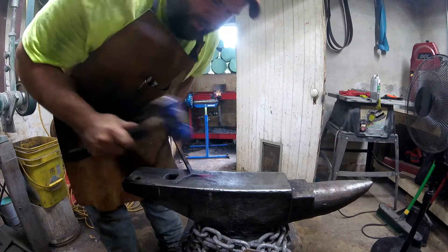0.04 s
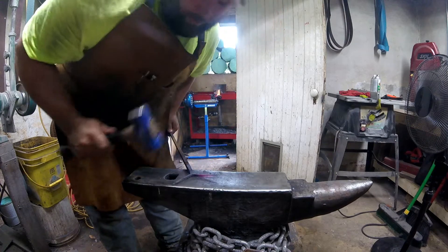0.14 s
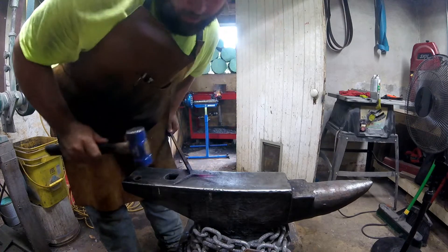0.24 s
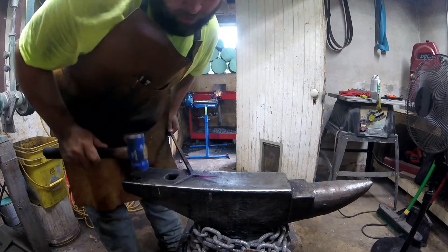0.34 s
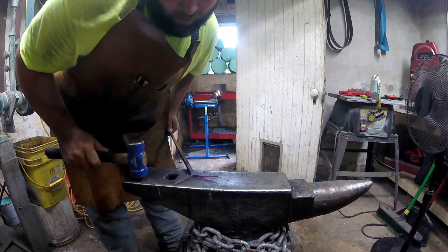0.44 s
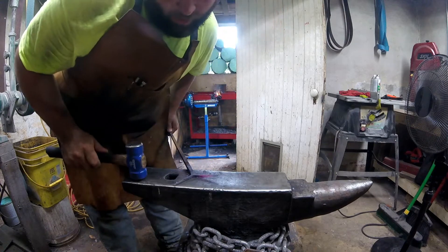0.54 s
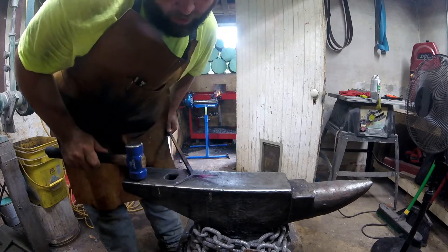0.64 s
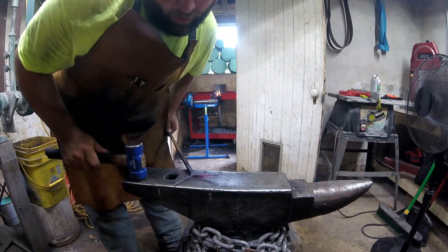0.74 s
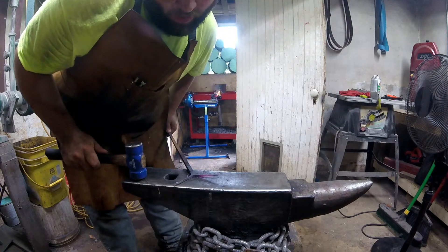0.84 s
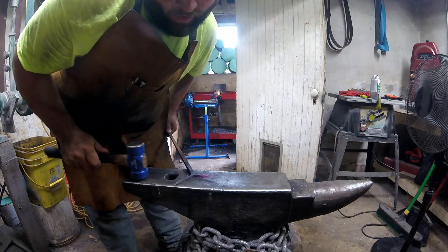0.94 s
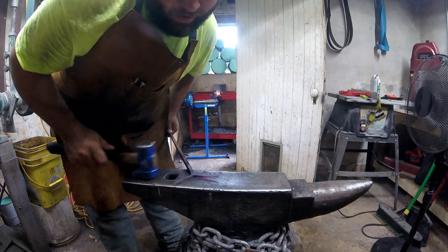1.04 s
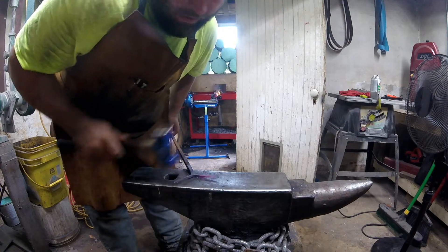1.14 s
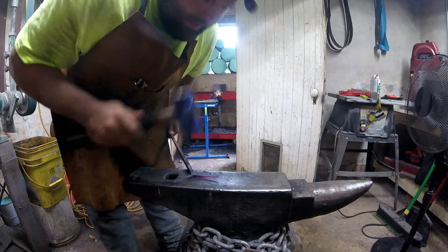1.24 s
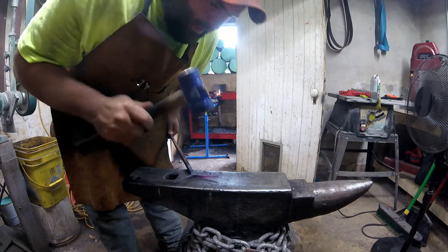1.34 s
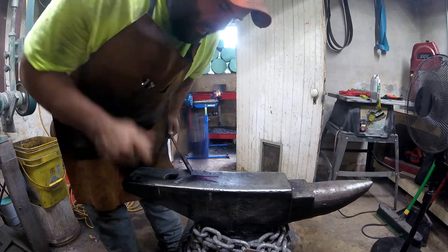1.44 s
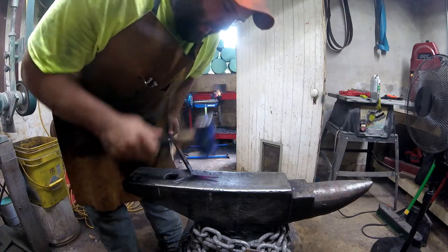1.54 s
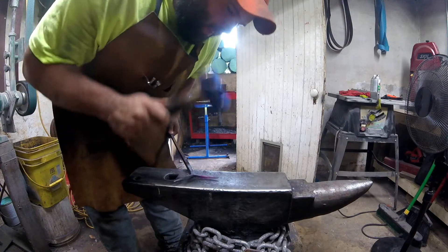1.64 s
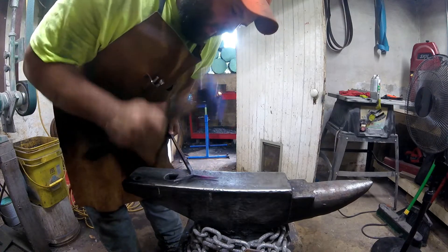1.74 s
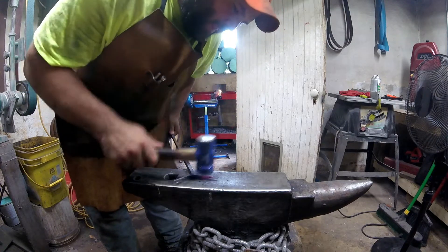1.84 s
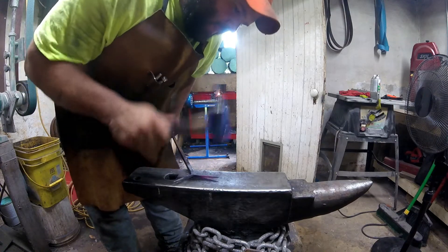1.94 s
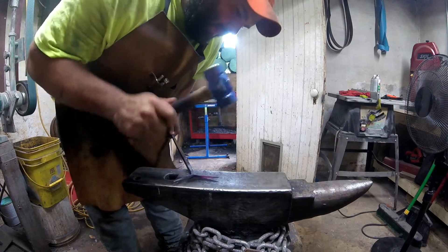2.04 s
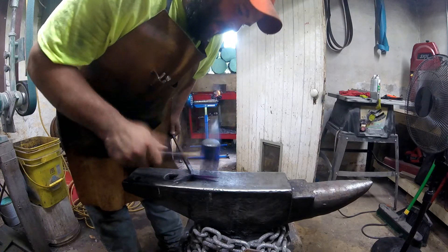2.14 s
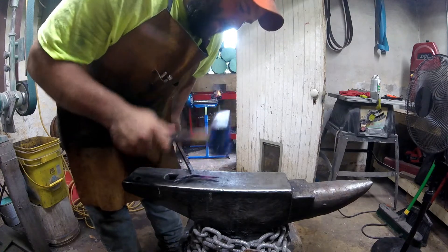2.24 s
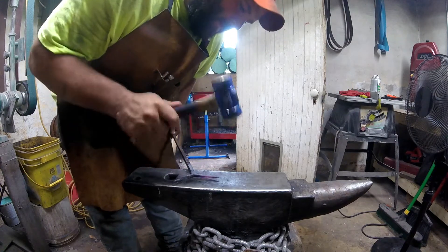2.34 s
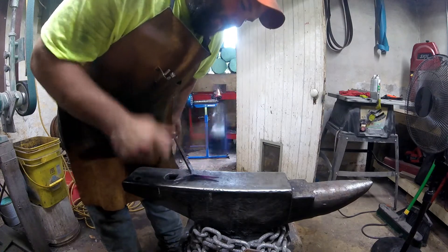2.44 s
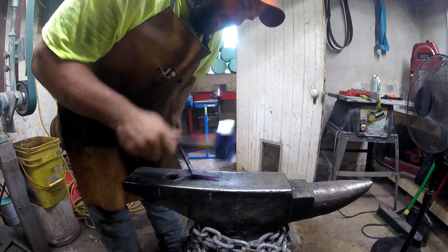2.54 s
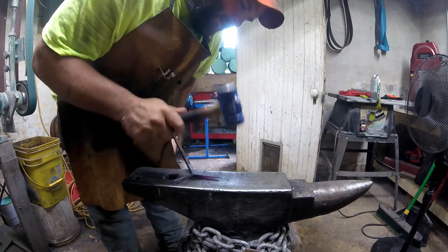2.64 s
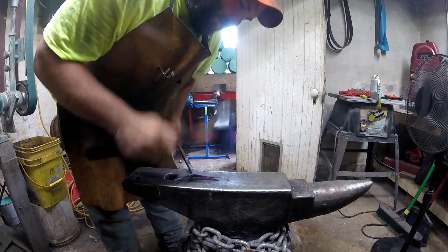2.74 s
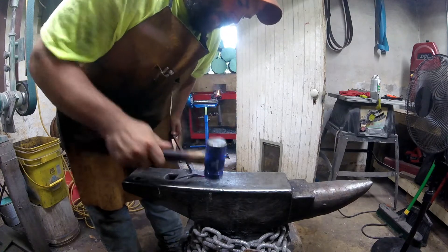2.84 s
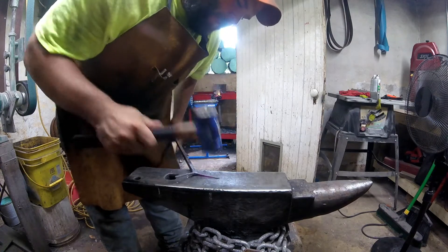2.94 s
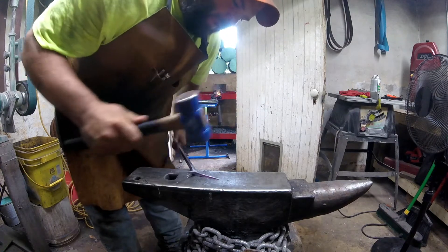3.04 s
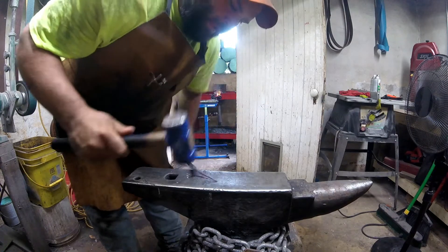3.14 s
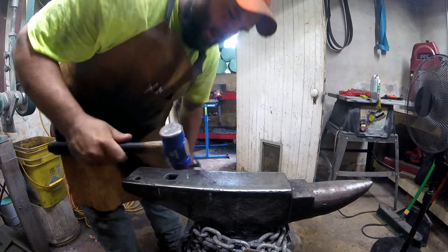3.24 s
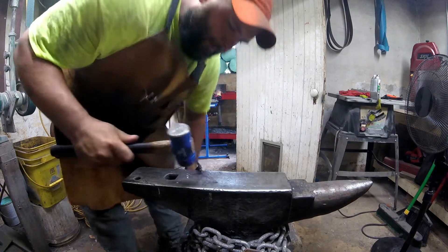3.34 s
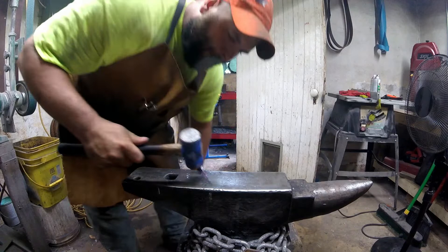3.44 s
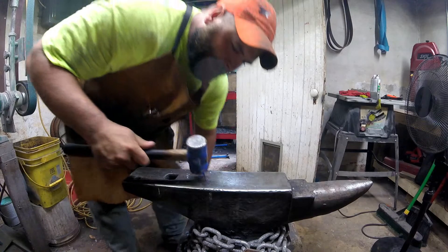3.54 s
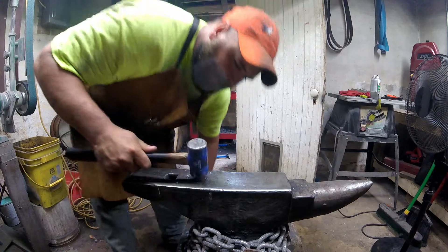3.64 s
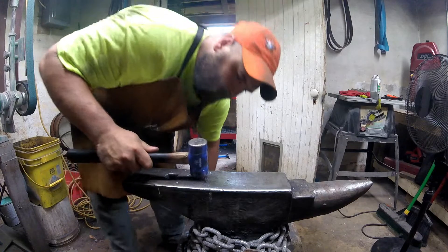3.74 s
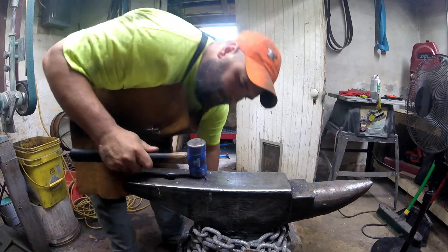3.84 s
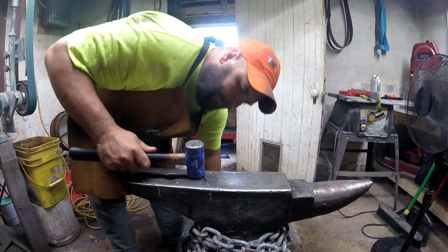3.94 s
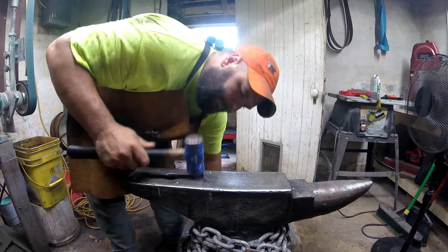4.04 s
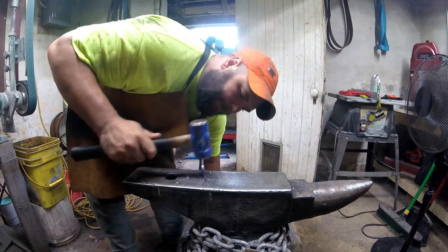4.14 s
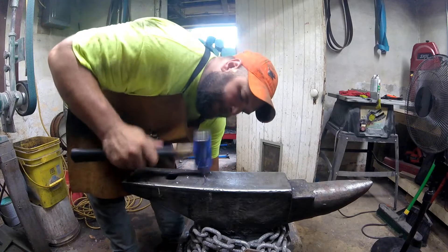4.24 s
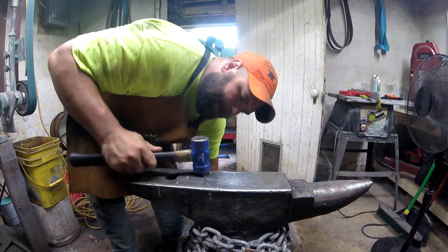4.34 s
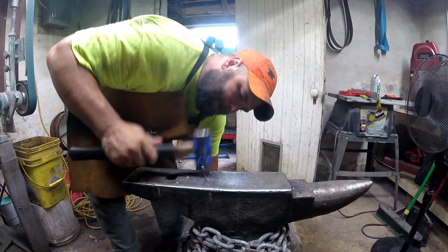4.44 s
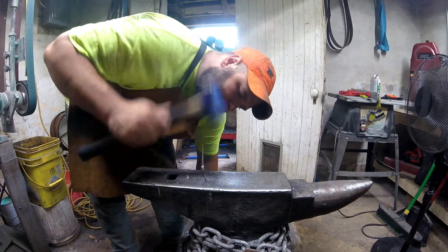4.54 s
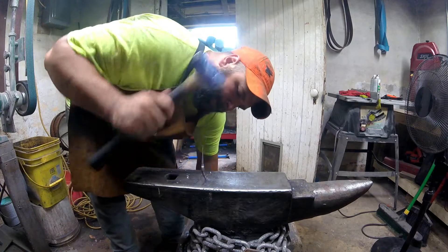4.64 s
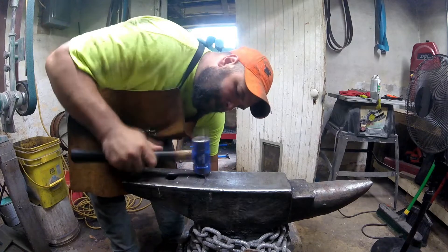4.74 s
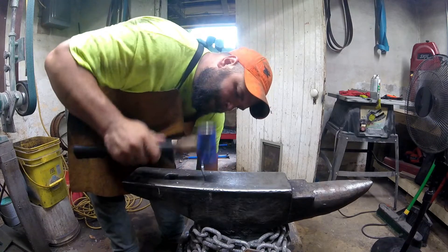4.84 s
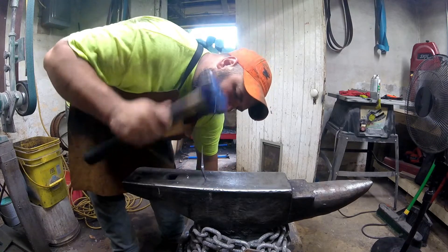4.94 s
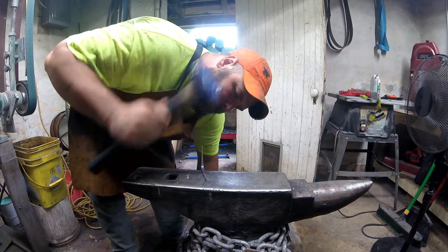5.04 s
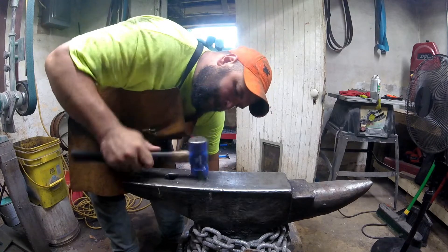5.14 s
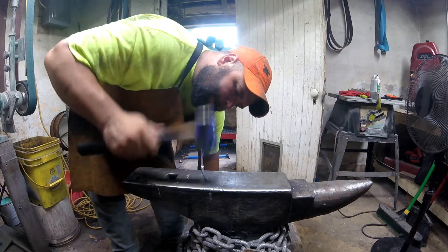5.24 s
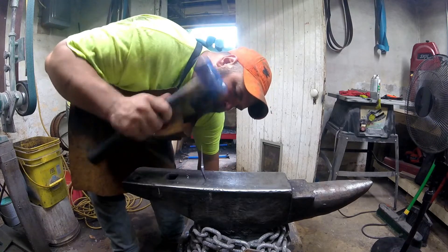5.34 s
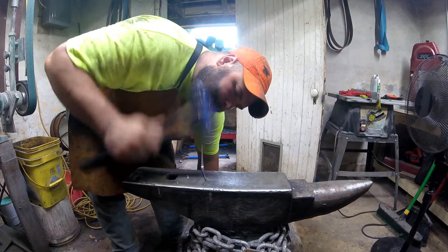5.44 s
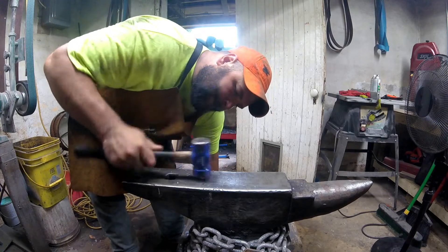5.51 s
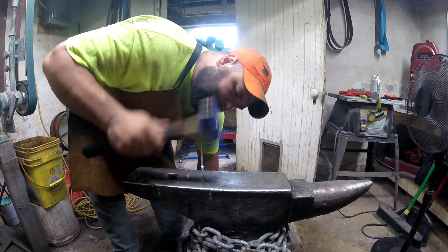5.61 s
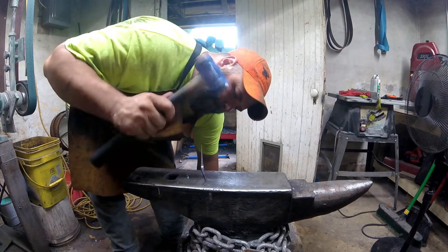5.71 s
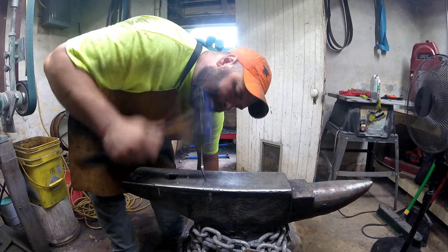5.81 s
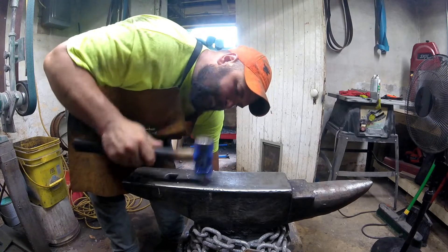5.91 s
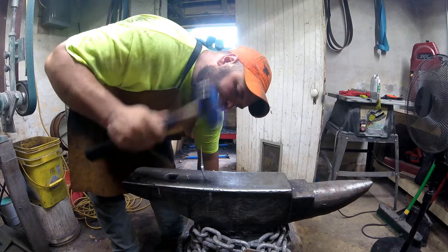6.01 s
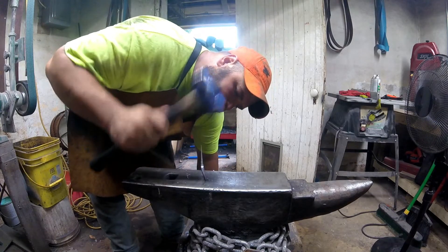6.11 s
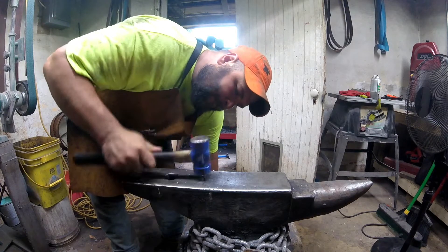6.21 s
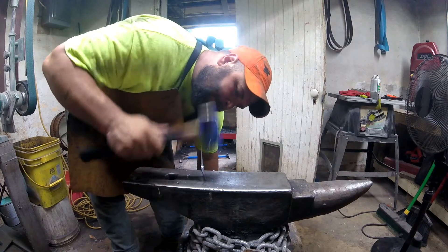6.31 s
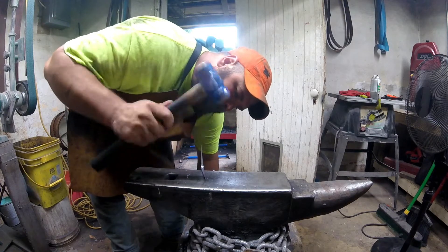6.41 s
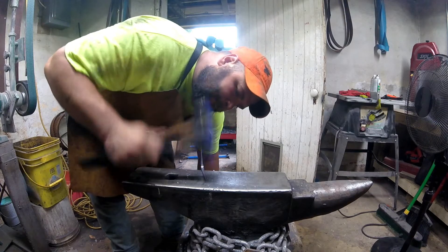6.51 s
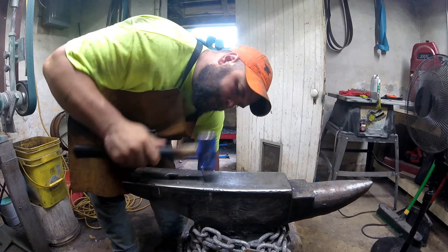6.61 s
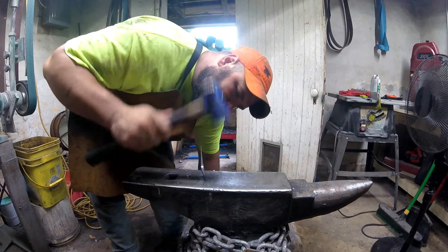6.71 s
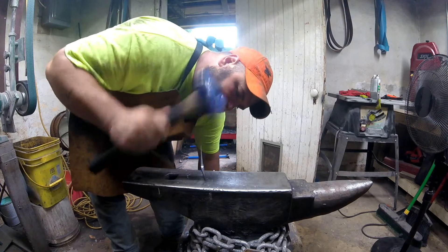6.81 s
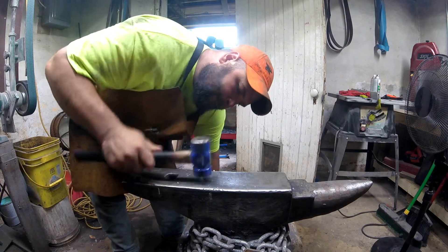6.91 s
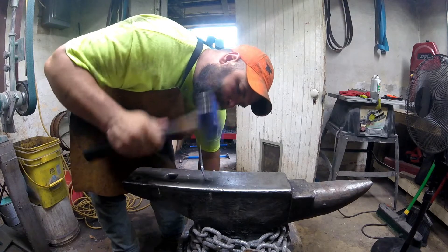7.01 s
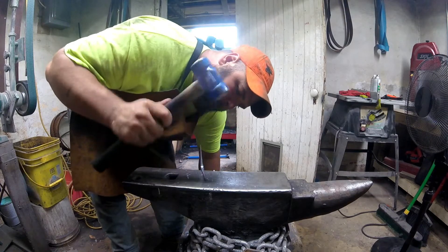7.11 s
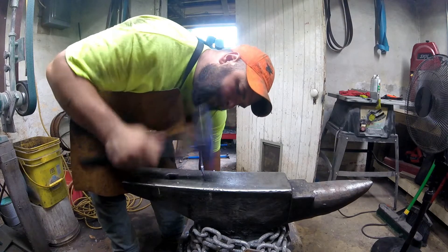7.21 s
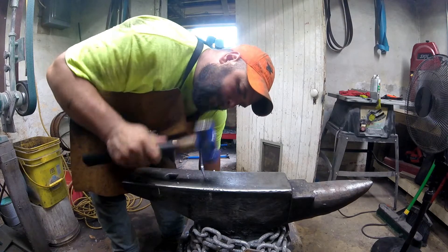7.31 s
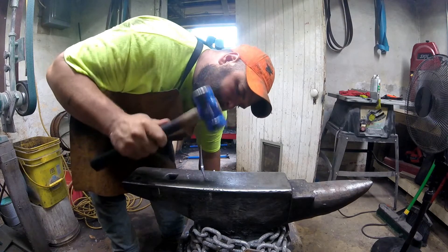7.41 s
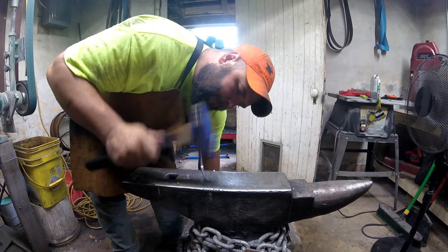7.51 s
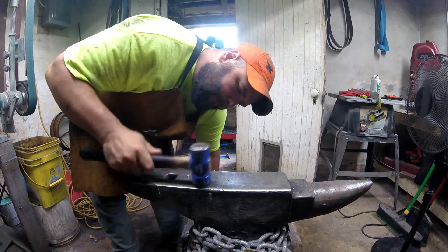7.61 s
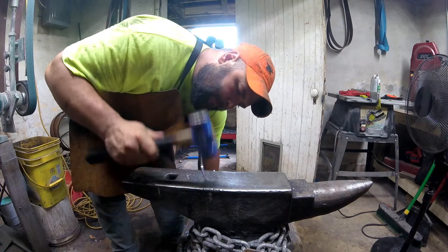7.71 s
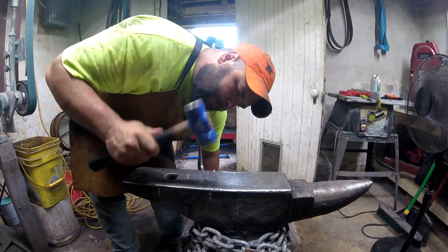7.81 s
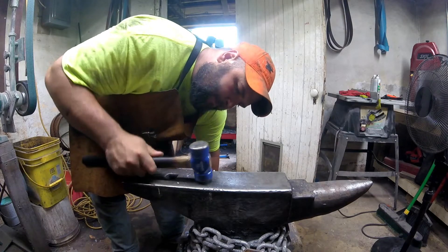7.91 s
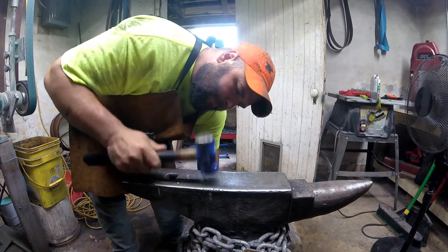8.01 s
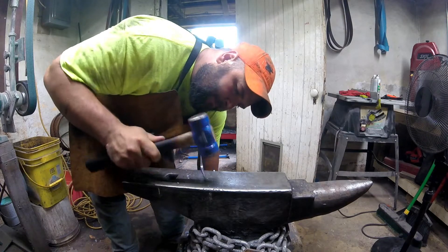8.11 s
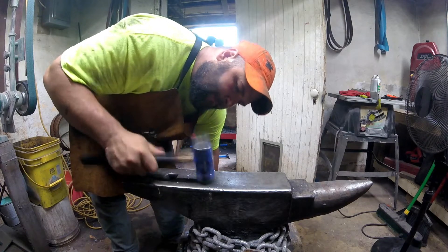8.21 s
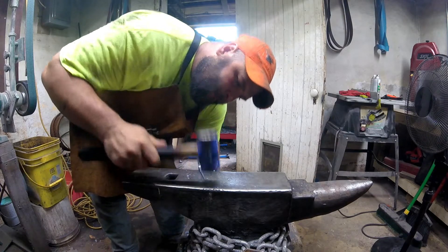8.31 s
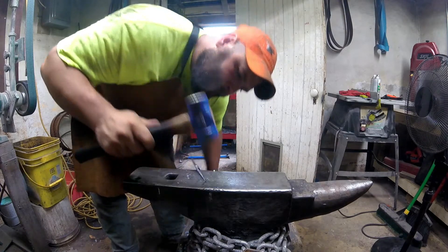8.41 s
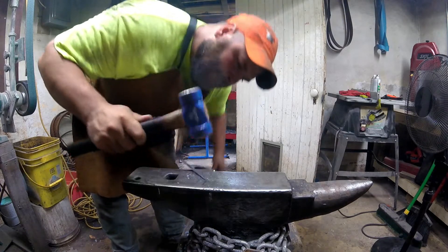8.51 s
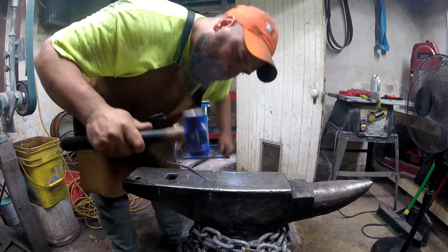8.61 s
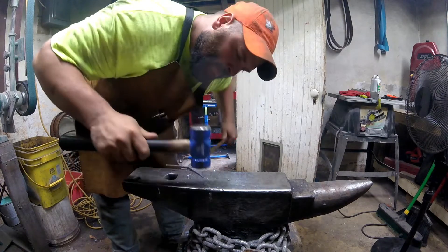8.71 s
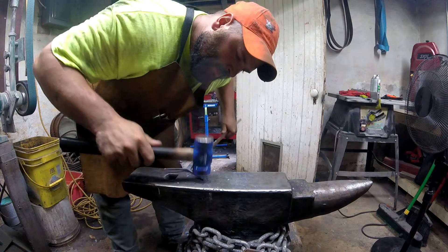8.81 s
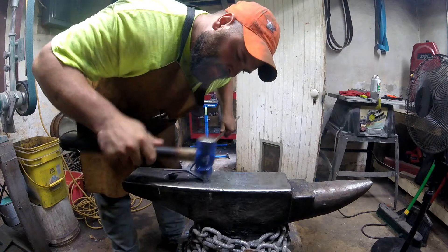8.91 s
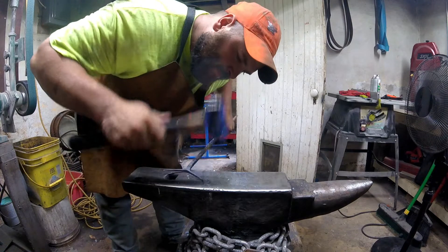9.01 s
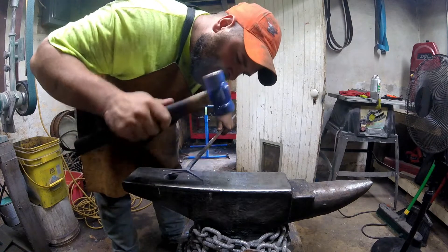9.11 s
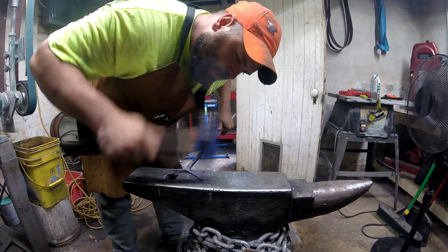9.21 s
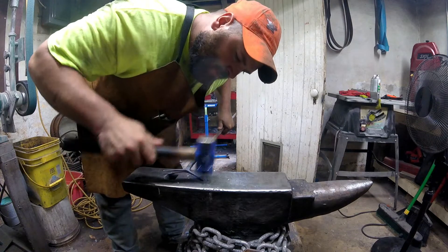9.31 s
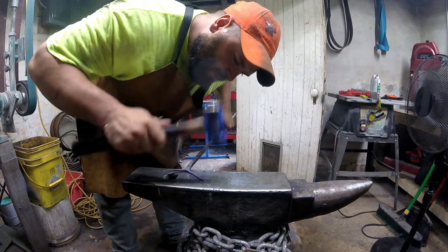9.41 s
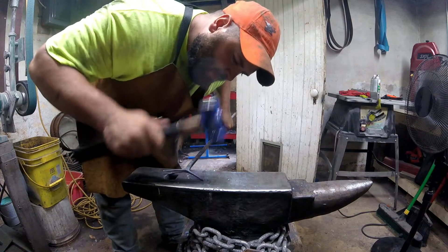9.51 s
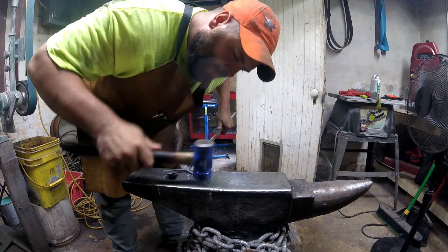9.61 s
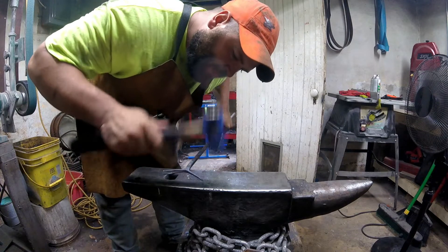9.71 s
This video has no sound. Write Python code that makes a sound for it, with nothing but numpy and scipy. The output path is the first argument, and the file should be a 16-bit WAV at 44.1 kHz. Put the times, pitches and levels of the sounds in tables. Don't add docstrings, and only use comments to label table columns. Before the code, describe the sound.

A hand hammer strikes steel on an anvil in steady ringing runs, with hammer bounces, a scrape and a squeak over a low blower rumble.

```python
import sys
import numpy as np
from scipy import signal
from scipy.fft import rfft, irfft, next_fast_len
from scipy.io import wavfile
from scipy.ndimage import uniform_filter1d, map_coordinates

SR = 44100
rng = np.random.default_rng(int(sys.argv[2]) if len(sys.argv) > 2 else 0)


def gain_from_db(level_db):
    decades = np.asarray(level_db, float) / 20
    return 10 ** decades


def int16_out(signal):
    q = np.round(np.clip(np.atleast_2d(signal).T, -1, 1) * 32767)
    wavfile.write(sys.argv[1], SR, q.astype(np.int16))


N = 430416

# start_s [s], clang_db [dB], thud_db [dB], tone_db [dB], clink_db [dB]
SET_DOWNS = [
    (3.411, -46, -64, -59, -56),
    (3.6563, -46, -45.5, -81, -41),
    (4.3232, -34, -35.5, -44, -40),
    (4.332, -21.5, -37.5, -45, -26.5),
]
# frequency_hz [Hz], t60_s [s]
SHOP_DECAY = [(40, 1), (110, 0.61), (280, 0.53), (740, 0.36), (1940, 0.34), (5000, 0.22), (13500, 0.3)]


def contacts():
    # start_s [s], clang_db [dB], thud_db [dB], tone_db [dB], heel_db [dB]
    bar_blows = [(-0.12, -7, -28, -27, -28), (1.5303, -12, -23.5, -26.0, -20),
                 (1.8777, -8, -25.5, -21.0, -18), (2.2159, -10.5, -30.0, -28.0, -14.5),
                 (2.5323, -9.5, -31, -34.5, -13), (2.8464, -8.5, -32.5, -30.0, -17.5),
                 (4.8056, -7.5, -26.5, -25, -33), (5.1867, -11, -31.5, -13.5, -16.0),
                 (5.5462, -9.5, -26.5, -24.5, -12), (5.904, -9, -26.5, -31.5, -17),
                 (6.2545, -11, -30.5, -22, -12), (6.6023, -12.5, -29.5, -39.5, -19.5),
                 (6.9502, -10.5, -32.5, -29.5, -11), (7.2995, -11.5, -33.5, -23.5, -9),
                 (7.6238, -29.5, -32, -42, -41), (7.9713, -16, -31.5, -37, -45),
                 (8.2879, -15, -29, -50.5, -31), (8.9135, -24.5, -36.5, -48, -52),
                 (9.3088, -10, -24, -27, -22), (9.648, -8.5, -25, -26.5, -18)]
    # start_s [s], clang_db [dB], thud_db [dB], tone_db [dB], heel_db [dB]
    face_bounces = [
        (0.4694, -13.5, -39.5, -18, -26),
        (0.5488, -20, -43.5, -33.5, -28),
        (0.5799, -24, -44.5, -30.5, -51),
    ]
    # thud_db [dB], tone_db [dB], heel_db [dB]
    usual_db = (-19, -18, -13)
    # thud_share, tone_share, heel_share [dB per dB]
    part_levels = dict(knock=(-13.5, -13, -27, 0.6949, -0.0652, -0.03),
                   sizzle=(-22, -35, -16, 0.71, 0.05, -0.2), bend=(-24.5, 3, -36, .05, -0.04, 0.15),
                   face=(-9, -12, -11.5, -0.12, 0.4333, 0.0552), waist=(-29, -23.5, -30, 0.33, 0.36, .45),
                   horn=(-30.5, -29, -25, -0.1, 0.46, -0.22), edge=(-24, -31.5, -13.5, 0.27, 0.44, -0.33),
                   hole=(-35, -53, -42, -1.3, 0.44, 0), shimmer=(-44, -48, -45, 0, 0.64, 0.1),
                   top=(-47, -68.5, -55, 0.7, 0.24, -0.2))
    # start_s [s], brightness_db [dB]
    crispness = [
        (1.53, 14),
        (4.81, -4.5),
        (5.19, 2),
        (5.9, -3.5),
        (6.6, 0),
        (7.62, -11.5),
        (7.97, -14),
        (9.31, -4.5),
        (9.65, -3),
    ]
    crisp_shares = dict(sizzle=1.05, face=0.28, waist=.45, horn=0.79, edge=.7, shimmer=1, top=1)
    out = []
    for kind, rows in enumerate((bar_blows, face_bounces, SET_DOWNS)):
        for s, clang_db, *given in rows:
            odd_db = np.array(given) - clang_db - usual_db
            crisp_db = sum(db for when, db in crispness if abs(when - s) < .04)
            levels = dict(clang=clang_db, thud=given[0], long=given[1], heel=given[2])
            for name, row in part_levels.items():
                follow_db = np.dot(row[3:], odd_db) + crisp_shares.get(name, 0) * crisp_db
                levels[name] = clang_db + row[kind] + follow_db
            out.append((s, levels))
    return sorted(out, key=lambda contact: contact[0])


def blow_noise(clang_db, thud_db, knock_db, sizzle_db):
    # frequency_hz [Hz], density_db [dB per Hz]
    burst_spectrum = [(15, -57.5), (25, 7), (187, 9), (296, 5), (410, 9.5), (927, -4.5), (1320, -6.5),
                      (3060, -14), (3320, -11), (4130, -12), (4480, -20.5), (6730, -25), (8830, -38.5),
                      (15200, -62.5), (16500, -50.5)]
    hz, t, z = signal.stft(rng.standard_normal(SR // 2), SR, nperseg=256)
    room_fall = gain_from_db(-60 * t / along(SHOP_DECAY, hz)[:, None])
    contact_fall = 2.52 * gain_from_db(-60 * t / 0.014)
    noise = signal.istft(z * (room_fall + contact_fall), SR, nperseg=256)[1][:SR // 2]
    noise[:40] = np.diff(21 * signal.windows.gaussian(41, 3.5))

    f = np.fft.rfftfreq(len(noise), 1 / SR)
    weight_db = along([(150, thud_db + 2.5), (700, knock_db + 0.5), (1100, knock_db + 5),
                       (2500, clang_db), (5000, clang_db), (9000, sizzle_db + 19),
                       (13000, sizzle_db + 7.0), (15500, clang_db + 0.5)], f)
    grip = rng.standard_normal(len(f))
    grip = unit(uniform_filter1d(uniform_filter1d(grip, size=16), size=16))
    modes_db = along([(1000, 1), (2500, 2.5), (5000, 3.5), (9000, 6.5)], f) * grip - 7 * (f < 900)
    modes_db += 14.5 * np.exp(-((f - 15520) / 160) ** 2) - 40 * (f > 15850)

    cepstrum = irfft(np.log(gain_from_db(along(burst_spectrum, f) + weight_db + modes_db) + 1e-9))
    cepstrum[1:len(cepstrum) // 2] *= 2
    cepstrum[len(cepstrum) // 2 + 1:] = 0
    impulse = irfft(np.exp(rfft(cepstrum)))[:SR // 5]
    return signal.fftconvolve(noise, impulse)[:len(noise)]


def standing_waves():
    # frequency_hz [Hz], level_db [dB]
    stand_modes = [(39, -9.5), (67, -2.5), (87, -11), (110, -7.5), (179, 1), (229, -10.5), (271, -6.5),
                   (300, -9.5), (316, -11.5), (386, 0), (427, 0.5), (486, -2.5), (511, -6.5), (540, -1.5),
                   (563, -5.5), (614, -5), (666, -6.5), (700, -4.5), (733, -3), (771, -3), (794, 0.5),
                   (834, 1), (869, -2)]
    hz, db = np.transpose(stand_modes)[:, :, None]
    t = np.arange(SR // 2) / SR
    phase = rng.uniform(0, 2 * np.pi, hz.shape)
    decay = gain_from_db(db - 60 * t / (0.71 * along(SHOP_DECAY, hz)))
    waves = decay * np.sin(2 * np.pi * hz * t + phase) * (1 - np.exp(-t / 0.0043))
    is_low = hz[:, 0] < 320
    return waves[is_low].sum(0), waves[~is_low].sum(0)


def blows():
    out = np.zeros(N + 2 * SR)
    low, middle = standing_waves()
    for s, db in contacts():
        burst = gain_from_db(8.5) * blow_noise(db["clang"], db["thud"], db["knock"], db["sizzle"])
        waves = gain_from_db(db["thud"] - 1.2) * low + gain_from_db(db["knock"] - 7) * middle
        out[place(s + .0004):][:len(burst)] += burst + waves
    return out[place(0):][:N]


def family(modes, t, scatter_db):
    hz, db, t60 = np.transpose(modes)[:, :, None]
    luck = rng.standard_normal((len(modes), 6))
    slow = np.sin(2 * np.pi * (22 + 6 * luck[:, 2:3]) * t + 3 * luck[:, 3:4])
    fast = np.sin(2 * np.pi * (47 + 9 * luck[:, 4:5]) * t + 3 * luck[:, 5:])
    flutter = slow + fast
    strike_db = scatter_db * (1 + (hz / 7000) ** 2) * luck[:, :1]
    envelope = gain_from_db(db + strike_db + 2.1 * flutter - 60 * t / (.9 * t60))
    tones = np.sin(2 * np.pi * hz * t + 1.3 * luck[:, 1:2] + 0.3 * flutter)
    return np.sum(envelope * tones, 0) * (1 - np.exp(-t / 0.0008))


def anvil():
    # frequency_hz [Hz], level_db [dB], t60_s [s]
    bend_modes = [(1562, -4, .32), (1738, -13, .26), (1798, -1, .31), (1826, -1, .31), (1878, -12, .26),
                  (10290, -46, .3), (13913, -46, .35)]
    face_modes = [(3268, -5, .25), (3348, -7, .2), (3382, -2, .28), (3405, -7, .28), (3465, -10, .22),
                  (3598, -6, .22), (15472, -41, .26)]
    heel_modes = [(3821, -8, .26), (3911, -15, .25)]
    waist_modes = [(4977, 0, .38), (4714, -7, .33)]
    horn_modes = [(5640, -2, .38), (5804, -1, .45)]
    edge_modes = [(6584, -3, .27), (6621, -1, .2)]
    hole_modes = [(7304, 0, .24), (7715, -10, .25)]
    shimmer_modes = [(7929, -8, .55), (8740, -12, .26), (9361, -3, .18), (9548, -12, .23),
                     (15702, -17, .45)]
    top_modes = [(10765, -2, .2), (11501, -3, .4), (11950, -8, .45)]
    # frequency_hz [Hz], level_db [dB], t60_s [s]
    clink_modes = [(2500, -9, .12), (3515, -2, .1), (3600, -3, .09), (3670, 0, .11), (3880, -8, .09),
                   (6660, -14, .1)]
    families = dict(bend=bend_modes, face=face_modes, heel=heel_modes, waist=waist_modes, horn=horn_modes,
                    edge=edge_modes, hole=hole_modes, shimmer=shimmer_modes, top=top_modes)
    tap_times = [row[0] for row in SET_DOWNS]
    out = np.zeros(N + 2 * SR)
    t = np.arange(SR * 2 // 5) / SR
    fade = np.clip((t[-1] - t) / .05, 0, 1)
    for s, db in contacts():
        struck = dict(families, heel=clink_modes) if s in tap_times else families
        ring = sum(gain_from_db(db[name]) * family(modes, t, scatter_db=1.03) for name, modes in struck.items())
        out[place(s + .0006):][:len(t)] += fade * ring
    return out[place(0):][:N]


def long_tone():
    # frequency_hz [Hz], t60_s [s], swell_s [s]
    tone_mode = (4163.5, 1.084, 0.0092)
    hz, t60_s, swell_s = tone_mode
    grip_loss = 55
    out = np.zeros(N + 2 * SR)
    t = np.arange(SR) / SR
    old = np.exp(-t / swell_s)
    decay = gain_from_db(-60 * t / t60_s - grip_loss * t ** 2)
    for s, db in contacts():
        k = place(s)
        out[k:k + SR] = (gain_from_db(db["long"]) * (1 - old) + out[k] * old) * decay
    strength = out[place(0):][:N]
    return strength, strength * np.sin(2 * np.pi * hz * np.arange(N) / SR)


def walls(x):
    t = np.arange(SR // 3) / SR
    tail = rng.standard_normal(len(t)) * gain_from_db(-60 * t / .26) * (t > .004)
    return signal.fftconvolve(x, tail / np.linalg.norm(tail))[:N]


def tongs():
    # frequency_hz [Hz], width_hz [Hz], level_db [dB]
    jaw_modes = [(2280, 100, 4), (3130, 300, -4), (4900, 150, -18)]
    # peak_s [s], peak_db [dB], rise [dB per s], fall [dB per s]
    buzz_swell = (2.135, -49, 240, 20)
    # frequency_hz [Hz], density_db [dB per Hz]
    grit_spectrum = [(590, -31), (1000, -14), (2050, -0.5), (2610, -5.5), (3370, -0.5), (4640, -11),
                     (6460, -11.5), (7060, -17), (14000, -55)]
    # peak_s [s], peak_db [dB], rise [dB per s], fall [dB per s]
    drag_swells = [
        (3.358, -54.5, 70, 400),
        (3.42, -52, 900, 100),
        (3.798, -36, 248, 177),
    ]
    # time_s [s], pitch_hz [Hz], level_db [dB]
    squeak_path = [
        (4.11, 547, -64),
        (4.124, 691, -49),
        (4.162, 607, -47),
        (4.168, 551, -41),
        (4.204, 533, -43.5),
        (4.3, 518, -44),
        (4.33, 514, -53),
    ]
    buzz = unit(filtered(rng.standard_normal(N) * gain_from_db(1.3 * wobble(76)), peaks(jaw_modes)))
    rattle = buzz * swell(*buzz_swell) * (np.arange(N) < 2.52 * SR)

    grit = rng.standard_normal(N) * gain_from_db(0.75 * wobble(150))
    drag = unit(filtered(grit, lambda f: gain_from_db(along(grit_spectrum, f))))
    drag = drag * sum(swell(*row) for row in drag_swells)

    pitch_hz = curves(squeak_path)[0] * (1 + .006 * wobble(60))
    tone = np.sqrt(2) * np.sin(2 * np.pi * np.cumsum(pitch_hz) / SR)
    return rattle + drag + tone * gain_from_db(1.7 * wobble(30)) * stroke(squeak_path)


def blower():
    # frequency_hz [Hz], density_db [dB per Hz]
    draught_spectrum = [(12, -57), (20, -9), (124, -9), (195, -13.5), (244, -10.5), (281, -13.5),
                        (351, -13.5), (583, -17.5), (652, -17.5), (772, -20), (2890, -27), (4160, -37),
                        (6530, -41.5), (12800, -56), (16500, -67)]
    # frequency_hz [Hz], width_hz [Hz], level_db [dB]
    port_modes = [(6550, 550, 1)]
    # frequency_hz [Hz], level_db [dB]
    motor_lines = [(60, -66.5), (85, -55.5), (121, -56), (245, -60.5)]
    # time_s [s], roar_db [dB]
    draught_levels = [(0.0, -56.5), (0.95, -53), (1.98, -51.5), (2.09, -51.5), (2.96, -55.5), (4.24, -51.5),
                      (5.57, -55.5), (5.79, -51), (6.36, -57.5), (7.28, -58), (9.65, -50), (9.76, -54.5)]

    def low(f):
        return 1 / (1 + (f / 450) ** 4)

    def rumble_response(f):
        return gain_from_db(along(draught_spectrum, f)) * np.sqrt(low(f))

    def roar_response(f):
        high = gain_from_db(along(draught_spectrum, f)) * np.sqrt(1 - low(f))
        return high * (1 + peaks(port_modes)(f)) * (f < 15850)

    roar_db, = curves(draught_levels)
    mean_db = roar_db.mean()
    rumble_db = mean_db + 3 + 1.43 * (roar_db - mean_db)
    rumble = unit(filtered(rng.standard_normal(N), rumble_response))
    roar = unit(filtered(rng.standard_normal(N), roar_response))
    t = np.arange(N) / SR
    lines = np.zeros(N)
    for hz, db in motor_lines:
        line = np.sin(2 * np.pi * hz * t + 1.1 * wobble(6.8))
        lines += np.sqrt(2) * gain_from_db(db + 2.4 * wobble(8.7)) * line
    rumble = gain_from_db(rumble_db + 1.4 * wobble(1.944)) * rumble
    return rumble + gain_from_db(roar_db + 1.0 + .7 * wobble(21)) * roar + lines


def ducking(loud):
    power = np.abs(uniform_filter1d(loud ** 2, size=441))
    over_db = np.clip(10 * np.log10(power + 1e-12) + 30, 0, None)
    t = np.arange(SR) / SR
    memory = np.exp(-t / 0.36) * (1 - np.exp(-t / 0.012))
    return gain_from_db(-1.4 * signal.fftconvolve(over_db, memory / memory.sum())[:N])


def flinch():
    gain_db = np.zeros(N)
    t = np.arange(N) / SR
    for s, db in contacts():
        gain_db -= np.clip(db["clang"] + 18, 0, 12) * .5 * (t > s - .042) * (t < s)
    return gain_from_db(uniform_filter1d(gain_db, size=120))


def thinned(x, strength):
    hz, t, z = signal.stft(x, SR, nperseg=1024, noverlap=768)
    size = uniform_filter1d(uniform_filter1d(np.abs(z), size=3, axis=0), size=5, axis=1)
    capped_strength = np.minimum(strength, gain_from_db(-39))
    in_band = ((hz > 4330) * (hz < 5580))[:, None]
    threshold = gain_from_db(-35.5) * np.interp(t, np.arange(N) / SR, capped_strength) * in_band
    return x - signal.istft(z * (size < threshold), SR, nperseg=1024, noverlap=768)[1][:N]


def unit(x):
    return x / np.sqrt(np.mean(x ** 2) + 1e-20)


def along(points, hz):
    f, v = np.transpose(points)
    return np.interp(np.log(hz + 1), np.log(f + 1), v)


def curves(rows):
    s, *cols = np.transpose(rows)
    return [np.interp(np.arange(N) / SR, s, c) for c in cols]


def wobble(rate):
    knots = rng.standard_normal(int(N * rate / SR) + 4)
    return map_coordinates(knots, [np.arange(N) * rate / SR])


def filtered(x, response):
    m = next_fast_len(N + SR // 2)
    return irfft(rfft(x, m) * response(np.fft.rfftfreq(m, 1 / SR)), m)[:N]


def peaks(modes):
    def response(f):
        return sum((-1) ** k * gain_from_db(db) * 1j * f * w / (c * c - f * f + 1j * f * w)
                   for k, (c, w, db) in enumerate(modes))
    return response


def swell(s, db, rise, fall):
    t = np.arange(N) / SR - s
    return gain_from_db(db + np.minimum(rise * t, -fall * t))


def stroke(rows):
    t = np.arange(N) / SR
    gate = 1. * (t > rows[0][0]) * (t < rows[-1][0])
    return gain_from_db(curves(rows)[-1]) * uniform_filter1d(gate, size=400)


def place(s):
    return round((s + .25) * SR)


def scene():
    ring = anvil()
    strength, tone = long_tone()
    hits = blows() + ring + gain_from_db(-8.5) * walls(ring)
    background = ducking(hits + tone) * blower()
    mix = tone + thinned(hits + tongs() + background, strength)
    return (flinch() * mix)[None]


def low_pass(x):
    return signal.sosfilt(signal.butter(12, 16830, fs=SR, output="sos"), x)


def record(dry):
    limited = dry / (1 + np.abs(dry / .9) ** 6) ** (1 / 6)
    finished = limited * np.clip(np.arange(N)[::-1] / 90, 0, 1)
    return low_pass(finished)


dry = scene()
out = record(dry)
int16_out(out)
```